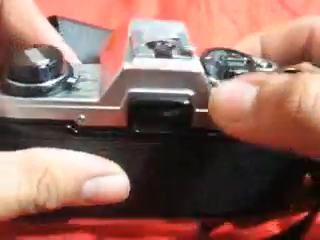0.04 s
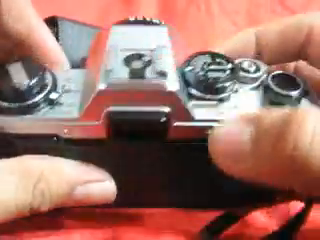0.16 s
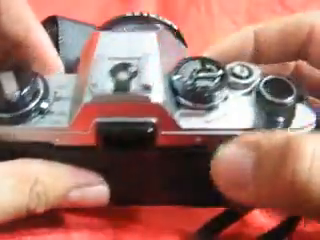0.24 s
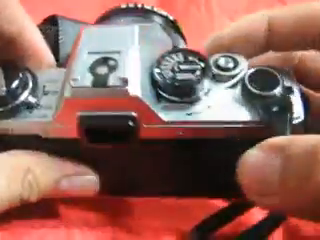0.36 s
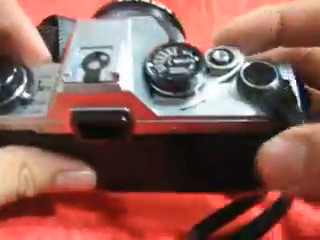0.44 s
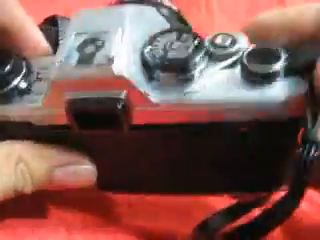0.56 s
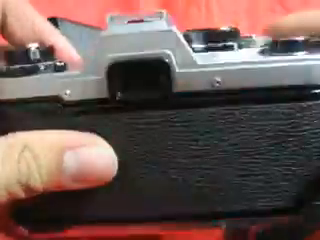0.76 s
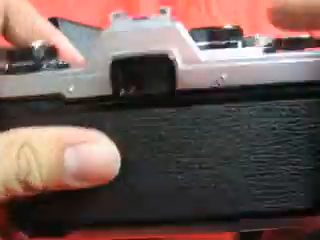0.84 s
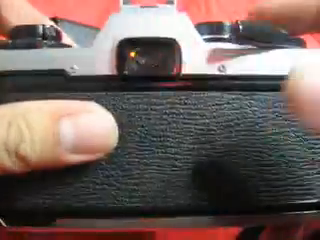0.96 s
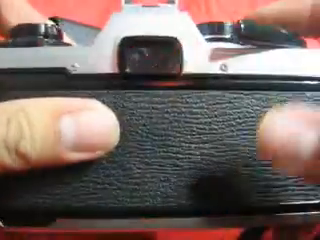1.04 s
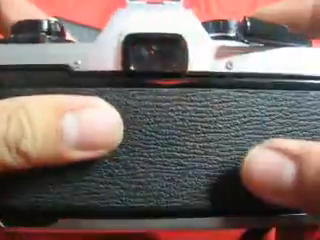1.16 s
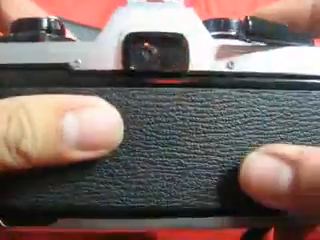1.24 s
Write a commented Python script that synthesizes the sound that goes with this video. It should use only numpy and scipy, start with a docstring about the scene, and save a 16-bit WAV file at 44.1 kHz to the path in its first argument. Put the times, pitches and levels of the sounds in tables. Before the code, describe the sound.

A metal film camera is wound close up in a small, dead room. Light, sharp clicks start at once, with a stronger one near 0.2 seconds. From 0.5 seconds gears scrape and ratchet, ending in a loud clatter around 0.65. More clicks come near 0.8 and 0.95 seconds, then very faint fingertip squeaks until about 1.2. Soft hand rubbing and low room noise lie underneath.

```python
"""Winding a metal film camera

Close up in a small, dead room, hands rub and knock on the case while pawls and levers click against it.
Gears scrape between the clicks, and the winding stroke ends in a loud clatter halfway through.
The recorder's gain control ducks the room noise under that clatter and lets it swell back.
A few more clicks follow, then faint squeaks of fingertips on metal."""
import sys
import numpy as np
from scipy import signal
from scipy.fft import rfft, irfft, next_fast_len
from scipy.io import wavfile

SR = 44100
rng = np.random.default_rng(int(sys.argv[2]) if len(sys.argv) > 2 else 0)


def log_audio(samples):
    """Write samples as a 16-bit WAV file to the path given in sys.argv[1]."""
    # one column per channel
    frames = np.atleast_2d(samples).T
    # limit to full scale, then quantise
    limited = np.clip(frames, -1, 1)
    pcm = np.round(limited * 32767).astype(np.int16)
    wavfile.write(sys.argv[1], SR, pcm)


N = 57330

# EQ curves for the room tone, the hand rubs, the crack of a contact and the grit of the gears.
# Each row: frequency in Hz, relative level in dB.
ROOM_TONE_EQ = [(15, -56), (25, -10.5), (145, -5.5), (394, -3), (651, -8), (836, -6), (1310, -17),
                (1530, -15), (2860, -19), (3580, -21.5), (8180, -28), (10000, -32.5), (13000, -70),
                (22000, -120)]
RUB_EQ = [(30, -8.5), (110, -0.5), (400, -1.5), (850, -3.5), (1300, -12.5), (3000, -14.5), (10000, -58)]
CRACK_EQ = [(300, -28.5), (700, -23), (1000, -13), (2000, -11.5), (3300, -8.5), (5000, -6), (7500, -2.5),
            (10000, -7.5), (12000, -11)]
GRIT_EQ = [(150, -59.5), (400, -12.5), (700, -8), (1000, -8.5), (1400, -1), (2000, -5), (3300, -3),
           (5000, -4), (7800, -0.5), (10000, -17.5), (12000, -23)]
# Swells of hands on the case, and of gears and sliding parts.
# Each row: peak time in seconds, rise and fall time constants in seconds, level in dB.
HAND_RUBS = [(.12, .25, 0.222, -51.5), (.47, 0.19, 0.255, -45), (.94, 0.12, 0.147, -43)]
GEAR_SCRAPES = [(0.227, 0.0039, 0.0065, -34.5), (0.364, 0.134, 0.146, -44.5), (.503, 0.02585, 0.02, -28),
                (0.57, 0.0329, 0.0252, -27.5), (0.625, 0.0069, 0.006, -17), (0.646, 0.0054, 0.0054, -16),
                (0.676, .02, 0.0463, -37.5), (0.828, 0.0236, 0.155, -39.5), (0.971, 0.024, 0.0116, -28)]
# Pawl and lever hits. Each row: start in seconds, level in dB over 1 ms before the low cut,
# crack energy decay in ms, pitch of the part in Hz, its share in dB, trim on the case ring in dB.
LEVER_CLICKS = [ (.0030, -28.5, .5, 7250, -1.5, 5.5), (0.183, -24.5, .5, 7564, 6.5, -5),
                (0.1937, -31.5, .9, 8010, 2.5, 8.5), (0.2244, -25.5, .6, 6240, -4.5, 4),
                (0.2302, -9, 0.61, 5799, 1, -1.5), (0.231, -17, .6, 3213, -0.5, 9),
                (.2308, -25.5, .4, 883.3, 14, 0), (0.3287, -30, .8, 8200, -21, 3),
                (.3490, -30.5, .4, 3857, 10, 10), (0.3582, -19, .3, 8025, 6, -3),
                (0.3707, -33, .6, 7400, -6, 12.5), (0.404, -37.5, .3, 6500, -4, 0.5),
                (0.4448, -26.5, 0.34, 2044, 5, 3), (0.4464, -21.5, .5, 3433, 8, 5.5),
                (0.4455, -14, 0.28, 8050, -1, -18), (0.4597, -27.5, .5, 7600, -10.5, -6),
                (0.4619, -16, .7, 7160, -6, -10), (0.4998, -24.5, .7, 7060, -13, -12),
                (0.5046, -13, .7, 6044, -1.5, -15.5), (.5080, -9.5, 0.87, 8164, 3, -20),
                (.5350, -27.5, 1.2, 2300, 2, 27.5), (0.5516, -18.5, .6, 8000, -7.5, -10),
                (0.5561, -8, .5, 3562, -7.5, 1), (0.559, -9, .6, 6900, -1.5, -12),
                (0.5686, -16, .7, 8100, -14.5, -17), (0.5713, -19, .8, 7260, -11, 1.5),
                (0.5804, -19.5, 1.2, 7500, 3, 3.5), (0.618, -0.5, .25, 7255, 4.5, -9.5),
                (0.6161, 5, 0.1, 6138, -13, -12.5), (.6235, -8, 0.92, 930, -19.5, -18),
                (0.6268, -0.5, 1.34, 7600, -12, -10.5), (0.6333, -6.5, .8, 7980, -17.5, -7),
                (0.6383, 4.5, 0.21, 8340, 2.5, 0), (0.6423, 7, .6, 7820, 4.5, -14),
                (0.6456, -5, 0.47, 965, -26.5, 14), (0.8192, -20.5, 0.85, 7102, -7.5, 2),
                (.8220, -6, 1.53, 7365, 2.5, -1.5), (0.8453, -13.5, 1.4, 7710, 8, 5),
                (.8490, -19.5, .9, 2680, 3, 10), (0.897, -17, .4, 7764, 11, -12.5),
                (0.8973, -19.5, .3, 2956, 9, 9), (0.9324, -33.5, .5, 4900, 8.5, -4.5),
                (0.9619, -4.5, .4, 5700, 6.5, 9), (0.9622, -8, 0.336, 7338, 12.5, 7),
                (0.9642, -9.5, 0.555, 2923, -16.5, -1), (0.9733, -44, 0.66, 8260, 1, 0), ]
# Resonances of the steel works, of the hollow case, and of the case under a finger.
# Each row: frequency in Hz, relative level in dB, time to fall 60 dB in seconds.
WORKS_MODES = [(5975, -0.5, .008), (6501, 4, 0.00741), (7114, 0, 0.0075), (7763, 3, .008),
               (8457, -6, 0.013), (8943, 1, 0.0054), (10130, -3, 0.00524)]
CASE_MODES = [(918.7, -8.5, 0.019), (1340, -6, 0.0105), (1890, -17.5, 0.01), (2699.6, 1.5, 0.01057),
              (3243.3, 0.5, 0.0153), (3625, -0.5, 0.01275), (4361, 0, 0.0099), (4608, 4.5, 0.01074)]
FINGER_MODES = [(808, -6, 0.0286), (943, -3, 0.0235), (1496, 3.5, 0.01), (2202, -14, 0.036),
                (2945, 2.5, 0.0116), (3740, 0.5, 0.0067)]
# Fingers bumping the case. Each row: start in seconds, level in dB over 1 ms, low-pass cutoff in Hz.
FINGER_KNOCKS = [(.0312, -23.5, 1104), (.7043, -27, 7000), (.7302, -28.5, 1700)]
# Skin slipping on metal. Each row: centre time in seconds, length in seconds, pitch in Hz, level in dB.
SKIN_SQUEAKS = [(1.047, 0.025, 2850, -54), (1.09, 0.0225, 2900, -51.5), (1.114, 0.0098, 5720, -66),
                (1.222, 0.0122, 5720, -58.5)]

RING_T = np.arange(4096) / SR  # time axis of one hit, in seconds
MS = .001


def undb(db):
    """Decibels to gain."""
    return 10 ** (np.asarray(db) / 20)


def unit(x):
    """Scale to an energy of one."""
    return x / np.sqrt(np.sum(x ** 2))


def fade(t60):
    """Exponential decay by 60 dB in t60 seconds."""
    return np.exp(-np.log(1000) * RING_T / t60)


def eq(x, curve):
    """Minimum-phase EQ through (Hz, dB) points, so nothing rings ahead of an attack."""
    hz, db = np.array(curve, float).T
    size = 2 * next_fast_len(len(x))
    bin_hz = np.maximum(np.arange(size // 2 + 1) * SR / size, 1)
    gain = undb(np.interp(np.log(bin_hz), np.log(hz), db))
    cepstrum = irfft(np.log(gain))
    cepstrum[1:size // 2] *= 2
    cepstrum[size // 2 + 1:] = 0
    return irfft(rfft(x, size) * np.exp(rfft(cepstrum)))[:len(x)]


def texture(noise, curve):
    """Shape scene-long noise with an EQ curve and set its RMS to one."""
    return unit(eq(noise, curve)) * np.sqrt(N)


def wander(points):
    """A line through random values spread evenly over the scene."""
    return np.interp(np.linspace(0, 1, N), np.linspace(0, 1, points), rng.standard_normal(points))


def swells(movements):
    """An envelope that rises to the peak of each movement and falls away."""
    t = np.arange(N) / SR
    return np.sqrt(sum(undb(db) ** 2 * np.exp(2 * np.minimum((t - peak) / rise, (peak - t) / fall))
                       for peak, rise, fall, db in movements))


def ring(modes, scatter_db=2.5):
    """Struck modes die away, their balance and phases a little different on each hit."""
    return unit(sum(undb(db + scatter_db * rng.standard_normal()) * fade(t60)
                    * np.sin(2 * np.pi * (hz * RING_T + rng.random())) for hz, db, t60 in modes))


def place(out, start, hit, db):
    """Mix in a hit whose energy equals db held for a millisecond."""
    i = max(int(start * SR), 0)
    out[i:i + len(hit)] += (unit(hit) * undb(db) * np.sqrt(MS * SR))[:N - i]


def room_tone(level_db=-48, waver_db=0.5):
    """A steady, slightly wavering bed of room noise."""
    level = undb(level_db - waver_db * wander(20))
    return texture(rng.standard_normal(N), ROOM_TONE_EQ) * level


def hand_rubs():
    """Soft, dull friction of hands shifting their grip."""
    return texture(rng.standard_normal(N), RUB_EQ) * swells(HAND_RUBS)


def lever_clicks(works_db=-1, case_db=-7.5, crack_db=2, part_t60_s=0.009, attack_s=0.000338):
    """Each contact cracks, and rings the works, the case and the part that struck."""
    out = np.zeros(N)
    attack = 1 - np.exp(-RING_T / attack_s)  # the blow takes time to spread through the metal
    for start, db, decay_ms, part_hz, part_db, case_trim_db in LEVER_CLICKS:
        burst = rng.standard_normal(len(RING_T)) * np.exp(-RING_T / (2 * decay_ms * MS))
        crack = undb(crack_db) * unit(eq(burst, CRACK_EQ))
        part = undb(part_db) * ring([(part_hz, 0, part_t60_s)])
        works = undb(works_db) * ring(WORKS_MODES)
        case = undb(case_db + case_trim_db) * ring(CASE_MODES)
        place(out, start, attack * (works + case + part + crack), db)
    low_cut = signal.butter(6, 857, "high", fs=SR, output="sos")  # the clicks carry no bass
    return signal.sosfilt(low_cut, out)


def finger_knocks():
    """Soft fingers wake only the lower modes of the case: dull knocks."""
    out = np.zeros(N)
    for start, db, cutoff_hz in FINGER_KNOCKS:
        soften = signal.butter(1, cutoff_hz, fs=SR)
        place(out, start, signal.lfilter(*soften, ring(FINGER_MODES)), db)
    return out


def gear_scrapes(slips_per_s=7000, scatter_db=2.5):
    """Dense tiny slips blur into grit that swells and dies with each movement."""
    slips = (rng.random(N) < slips_per_s / SR) * np.sign(rng.standard_normal(N))
    strength = undb(scatter_db * rng.standard_normal(N))
    return texture(slips * strength, GRIT_EQ) * swells(GEAR_SCRAPES)


def skin_squeaks(pitch_jitter=.05):
    """A fingertip slides on metal and sings briefly, with an unsteady pitch."""
    t, out = np.arange(N) / SR, np.zeros(N)
    for centre, length, hz, db in SKIN_SQUEAKS:
        pitch_hz = hz * (1 + pitch_jitter * wander(1500))
        tone = np.sqrt(2) * np.sin(2 * np.pi * np.cumsum(pitch_hz) / SR)
        envelope = np.exp(-(2 * (t - centre) / length) ** 2)
        out += undb(db) * tone * envelope
    return out


def dead_room(x, wet_db=-16.5, t60_s=0.0916, build_s=0.0044):
    """Nearby surfaces add a brief diffuse tail."""
    build = 1 - np.exp(-(RING_T / build_s) ** 2)
    tail = rng.standard_normal(len(RING_T)) * fade(t60_s) * build
    return x + undb(wet_db) * signal.fftconvolve(x, unit(tail))[:N]


def scene():
    """The camera in its room, over dry hand rubs and room tone, in mono."""
    camera = lever_clicks() + finger_knocks() + gear_scrapes() + skin_squeaks()
    return (dead_room(camera) + hand_rubs() + room_tone())[None]


def record(dry, threshold_db=-29.5, memory_s=0.1144, ceiling=.98):
    """Gain control ducks the mix as recent power rises; peaks are soft-clipped and the top octave is cut."""
    step = 1 / (memory_s * SR)
    recent_power = signal.lfilter([step], [1, step - 1], dry[0] ** 2)
    ducked = dry[0] / np.sqrt(1 + recent_power / undb(threshold_db) ** 2)
    clipped = ceiling * np.tanh(ducked / ceiling)
    shelved = eq(clipped, [(10563, 0), (10763, -11.5)])
    high_cut = signal.ellip(8, .2, 80, 11900, fs=SR, output="sos")
    return signal.sosfilt(high_cut, shelved)[None]


dry = scene()
out = record(dry)
log_audio(out)
```